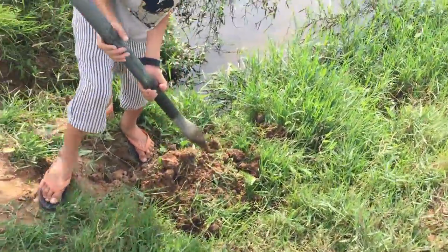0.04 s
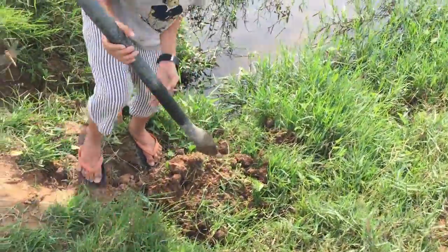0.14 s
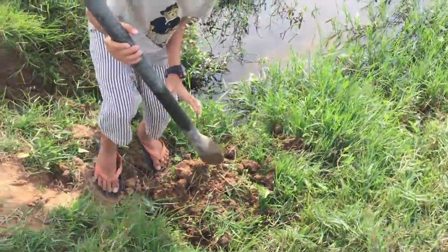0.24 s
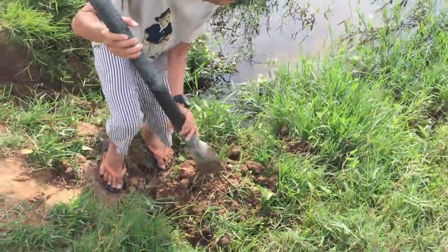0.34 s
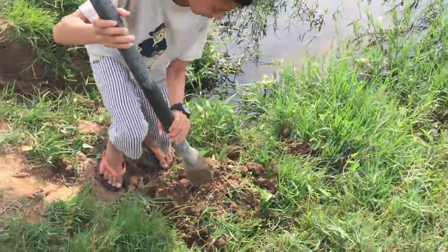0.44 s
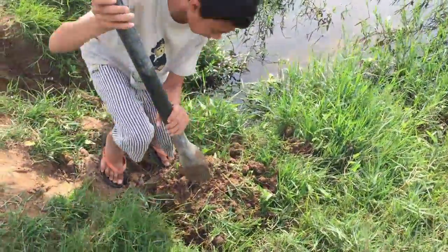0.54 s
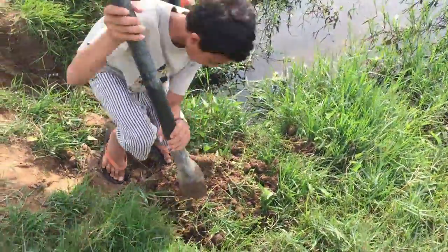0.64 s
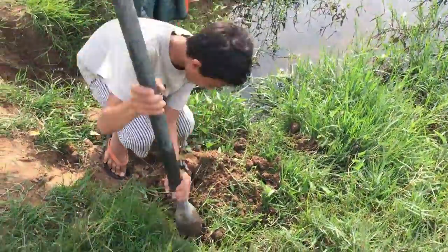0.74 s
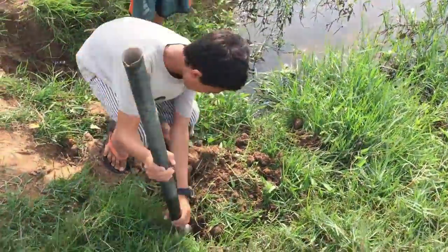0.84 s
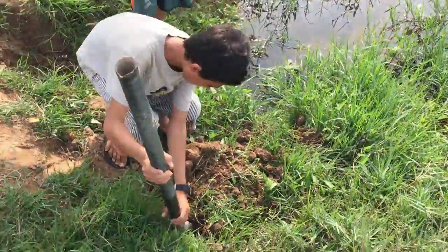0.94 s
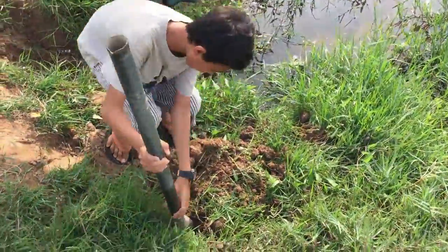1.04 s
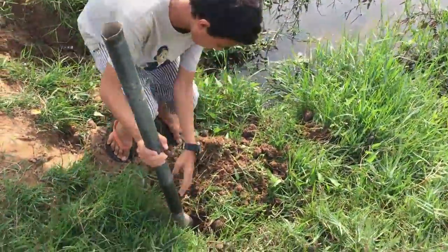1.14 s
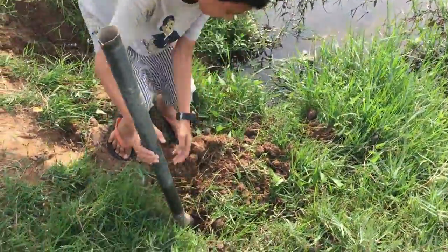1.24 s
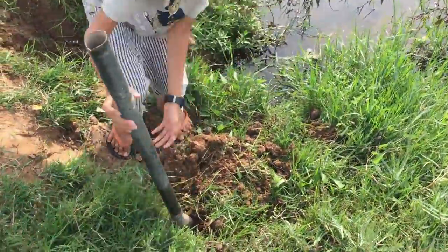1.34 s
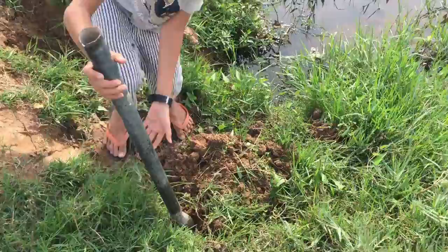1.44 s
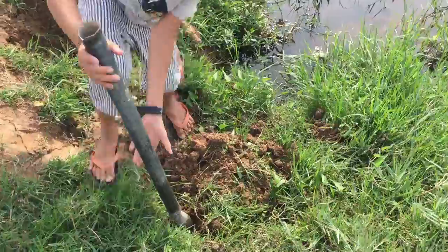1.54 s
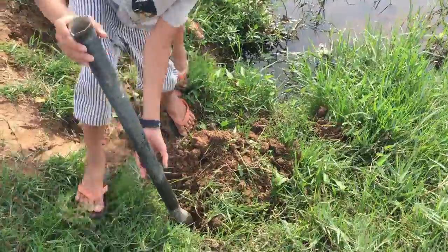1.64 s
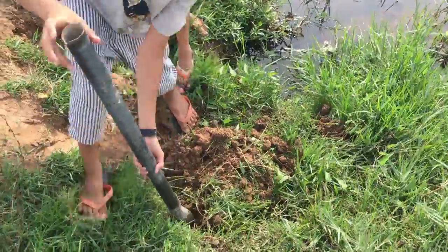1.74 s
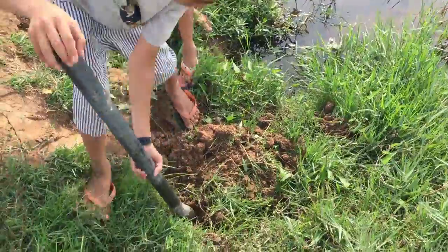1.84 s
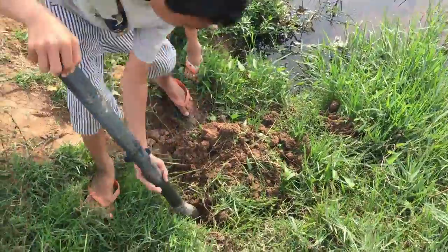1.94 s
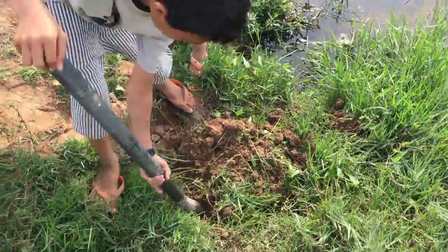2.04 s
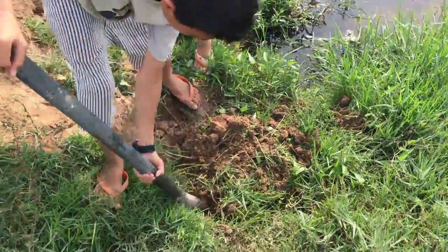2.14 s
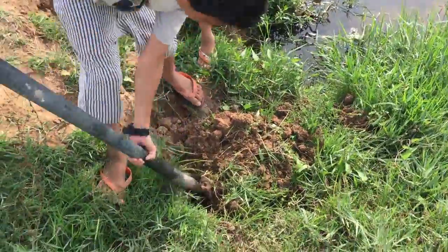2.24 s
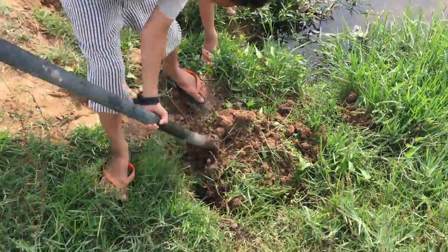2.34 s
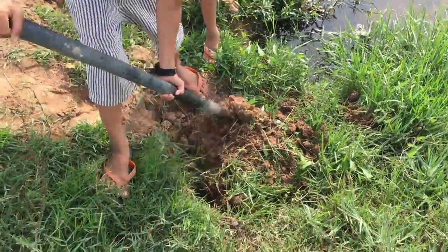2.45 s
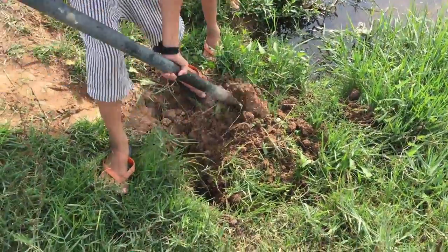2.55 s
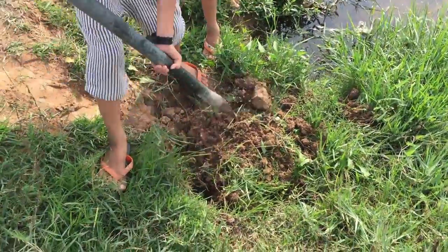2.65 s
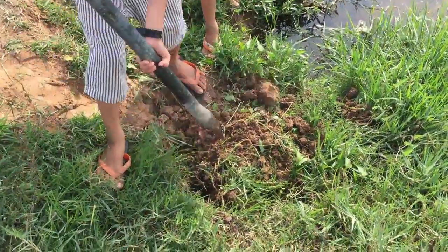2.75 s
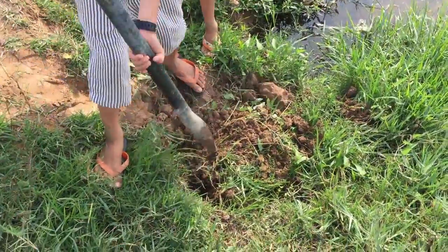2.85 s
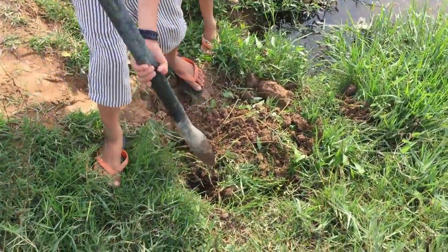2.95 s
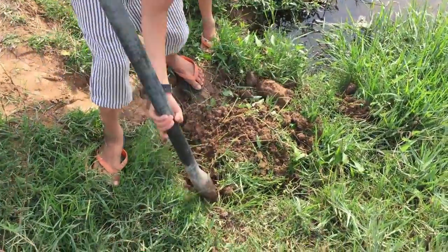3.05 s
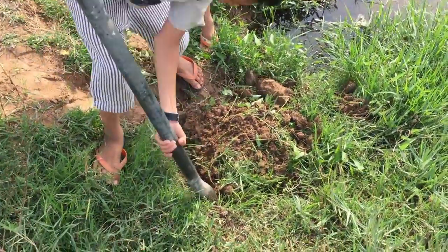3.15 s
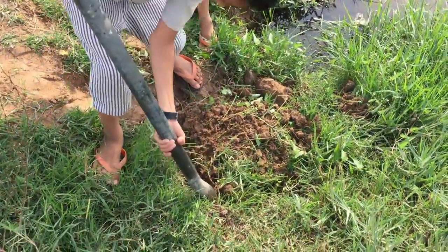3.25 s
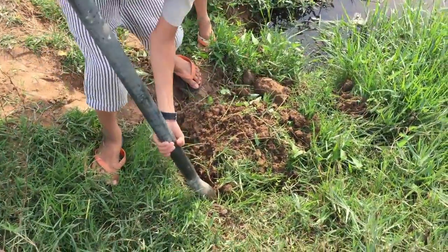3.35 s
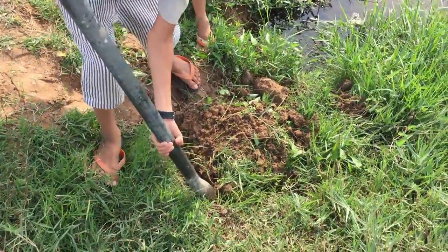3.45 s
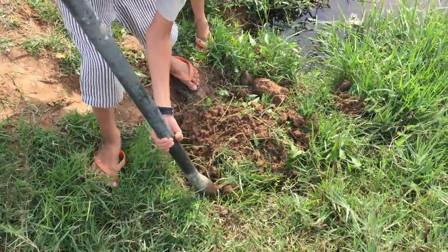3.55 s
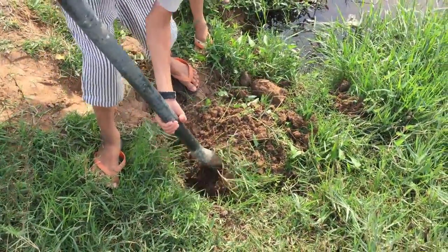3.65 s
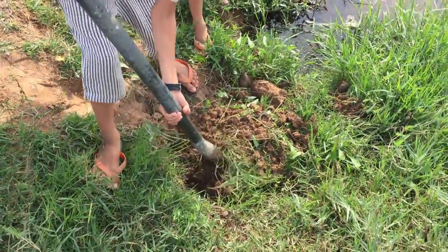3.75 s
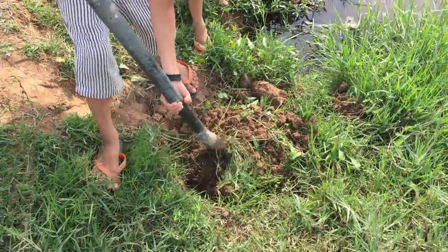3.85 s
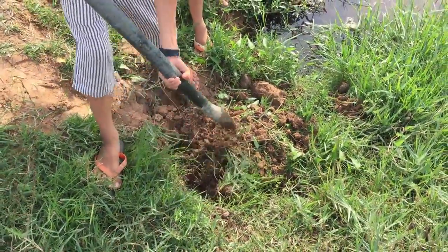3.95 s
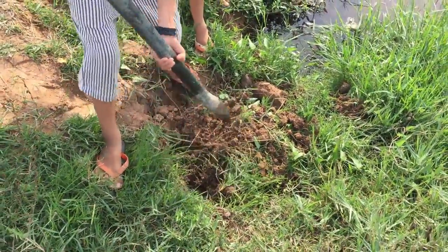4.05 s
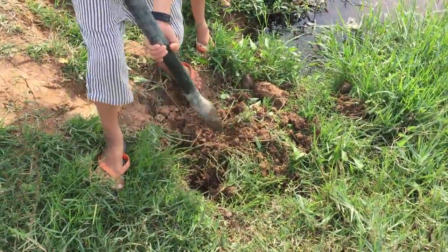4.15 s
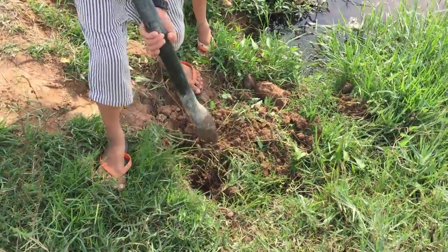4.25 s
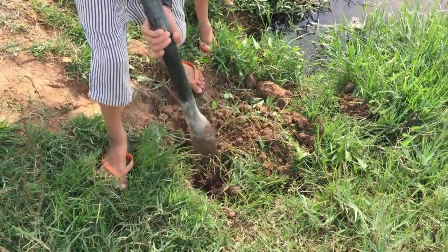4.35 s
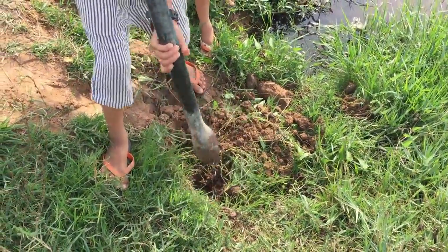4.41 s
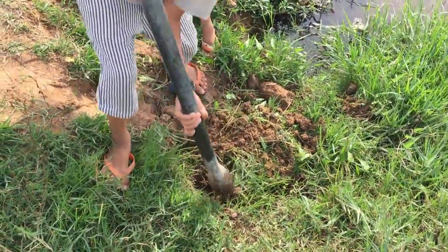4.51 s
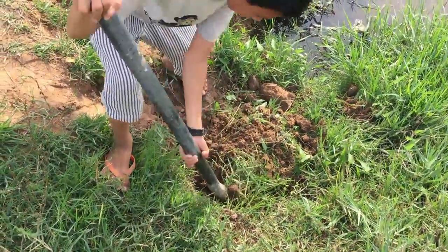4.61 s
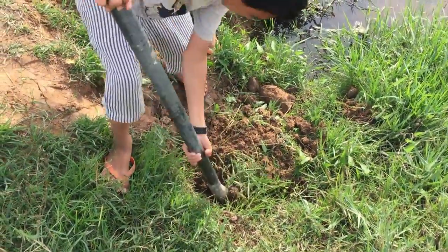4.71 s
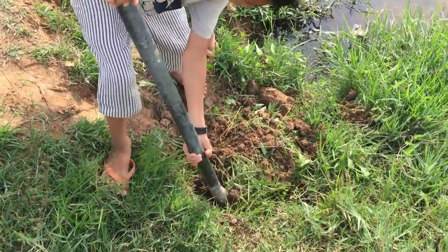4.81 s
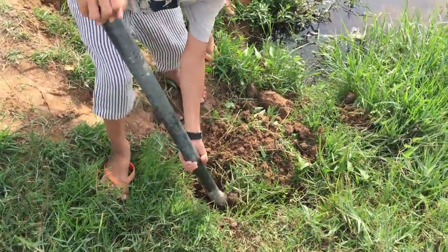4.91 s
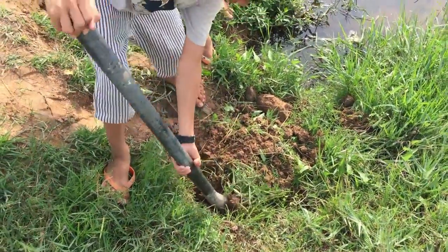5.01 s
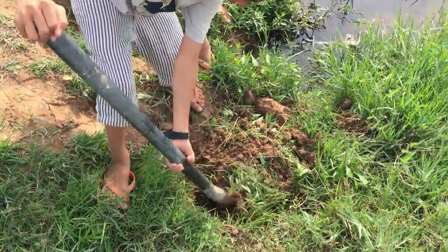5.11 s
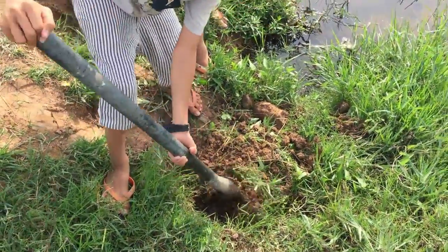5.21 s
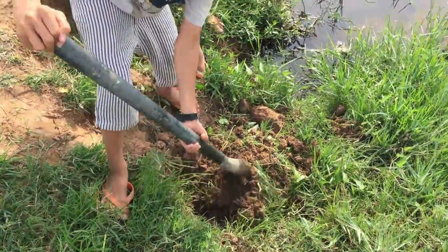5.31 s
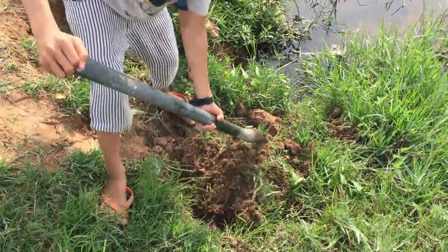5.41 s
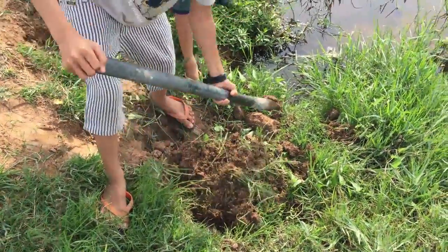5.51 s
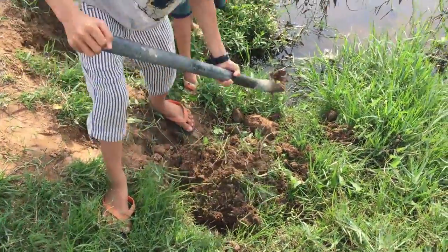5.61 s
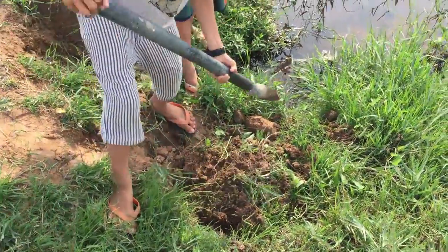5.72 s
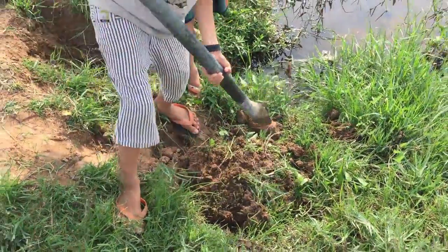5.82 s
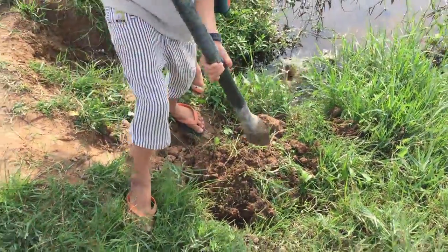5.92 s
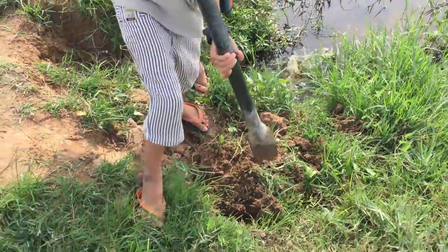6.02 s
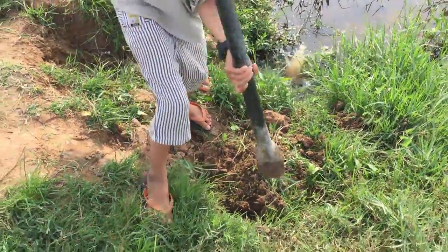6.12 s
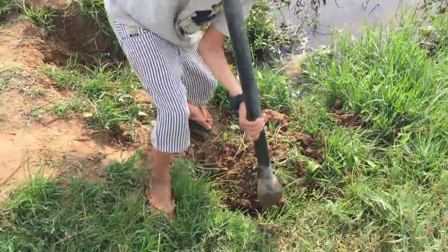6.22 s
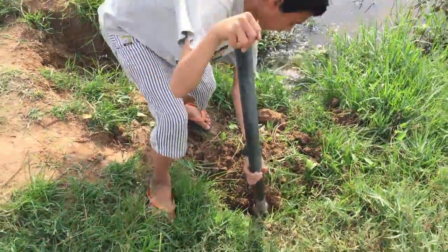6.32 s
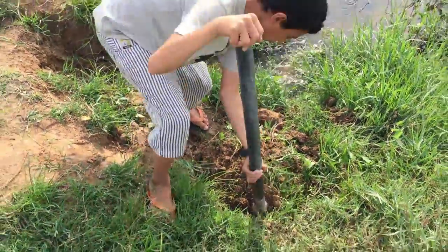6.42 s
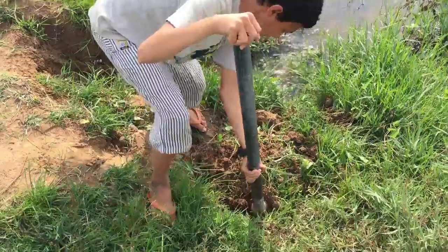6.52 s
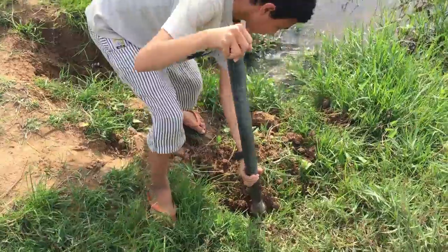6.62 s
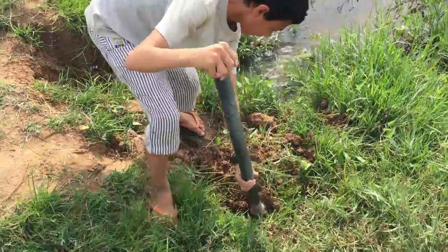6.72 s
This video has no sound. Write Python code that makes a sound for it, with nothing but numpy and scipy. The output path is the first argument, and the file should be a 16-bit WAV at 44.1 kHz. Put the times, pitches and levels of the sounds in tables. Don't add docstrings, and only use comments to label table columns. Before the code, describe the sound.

Outdoors on a grassy pond bank, a steel blade on a pipe handle digs damp soil close to the microphone. After soft grass rustle and bird whistles, a crunchy chop lands with a low thud and wet plop. Light prying scrapes follow, then harder cuts, clods breaking, roots snapping and crumbs falling, ending with two close bites. Quiet air, faint insects and a far engine rumble lie underneath.

```python
import sys
import numpy as np
from scipy import signal
from scipy.fft import rfft, irfft, next_fast_len
from scipy.io import wavfile
from scipy.ndimage import uniform_filter1d

SR = 44100
rng = np.random.default_rng(int(sys.argv[2]) if len(sys.argv) > 2 else 0)


def dump(signal):
    limited = np.clip(np.atleast_2d(signal).T, -1, 1)
    pcm = np.round(limited * 32767).astype(np.int16)
    wavfile.write(sys.argv[1], SR, pcm)


def invert_db(level):
    return 10 ** (np.asarray(level, dtype=float) / 20)


N = 298557
TIME = np.arange(N) / SR


def evened(x):
    return x / np.sqrt(np.mean(x ** 2) + 1e-20)


def noise():
    return rng.standard_normal(N)


def add(mix, s, sound):
    part = mix[round(s * SR):][:len(sound)]
    part += sound[:len(part)]


def coloured(x, points):
    hz, db = np.transpose(points)
    size = next_fast_len(N)
    log_hz = np.log(np.fft.rfftfreq(size, 1 / SR) + 1)
    shape = invert_db(np.interp(log_hz, np.log(hz), db))
    return evened(irfft(rfft(x, size) * shape, size)[:N])


def resonate(x, hz, width):
    return signal.lfilter(*signal.iirpeak(hz, hz / width, SR), x)


def grains(per_s, spread_db):
    size = invert_db(spread_db * np.minimum(rng.exponential(1, N), 4)) * rng.choice([-1, 1], N)
    return size * (rng.random(N) < per_s / SR)


def wobble(seconds, depth_db):
    count = max(int(seconds * SR), 1)
    slow = uniform_filter1d(uniform_filter1d(noise(), count), count)
    return invert_db(depth_db * evened(slow))


def patches(x, depth_db, size):
    z = signal.stft(x, nperseg=256)[2]
    spots = rng.standard_normal(z.T.shape)
    spots = uniform_filter1d(uniform_filter1d(spots, size, 0), 3, 1).T
    return evened(signal.istft(z * invert_db(depth_db * evened(spots)), nperseg=256)[1][:N])


def echoed(x, t60_s, length, echo_db):
    tail = evened(rng.standard_normal(length) * invert_db(-60 * TIME[:length] / t60_s)) / np.sqrt(length)
    return invert_db(echo_db) * signal.oaconvolve(x, tail)[:N]


def pressure(strokes):
    out = np.zeros(N)
    for s, rise, fall, db in strokes:
        rise, fall = max(rise, .001), max(fall, .002)
        t = np.arange(-min(2 * rise, s), 3 * fall, 1 / SR)
        u = np.abs(np.where(t < 0, t / rise, t / fall))
        add(out, s + t[0], invert_db(db) * (np.exp(-2 * u ** 1.9) + .08 * np.exp(-1.6 * u)))
    return out


def lever(rows, mass_db, grit, clod, mass, pipe):
    rub = pressure([row[:4] for row in rows])
    press = pressure([row[:3] + row[4:] for row in rows])
    return grit * rub + (.58 * clod + invert_db(mass_db) * mass + invert_db(2.5) * pipe) * press


def knocks(rows, t60_s=0, cycles=0, glide=0, soft_s=.0001):
    out = np.zeros(N)
    cracks = rng.standard_normal((len(rows), 256))
    for (s, db, hz, *tick_db), crack in zip(rows, cracks):
        t60 = t60_s + cycles / hz
        t = np.arange(0, t60 * 1.5, 1 / SR)
        tone = np.sin(2 * np.pi * hz * t * (1 + glide * t / t60))
        ring = tone * invert_db(-60 * t / t60) * (1 - np.exp(-t / soft_s))
        ring = ring / np.abs(ring).max()
        if tick_db:
            ring = ring + invert_db(tick_db[0]) * np.resize(crack, len(t)) * np.exp(-t / 0.00042)
        add(out, s, invert_db(db) * ring)
    return out


def wet_ring(rows, t60_s):
    return knocks(rows, t60_s, glide=0.045, soft_s=0.0012)


def note(length, from_hz, to_hz, db, slide_s, bend):
    t = np.arange(0, length, 1 / SR)
    left = np.clip((length - t) / min(slide_s, length), 0, 1) ** bend
    hz = uniform_filter1d(to_hz + (from_hz - to_hz) * left, 600, mode="nearest")
    return hz, np.sqrt(2) * invert_db(db) * np.sin(np.pi * (t / length) ** 0.87) ** 0.79


def sung(hz, gain):
    return gain * np.sin(2 * np.pi * np.cumsum(hz) / SR)


# (pitch [Hz], level [dB])
AIR = [(120, -22), (200, -16), (278, -6.5), (394, -12), (500, -12.5), (791, -13), (867, -14), (933, -12),
       (1910, -16), (2610, -20), (4200, -20), (4770, -23.5), (8900, -25.5), (10500, -28.5), (16000, -22.5)]


def still_air():
    return invert_db(-67.5) * patches(coloured(noise(), AIR), .8, size=20)


# (pitch [Hz], level per Hz [dB])
RUMBLE = [(12, -63), (20, -32.5), (24, -33), (35, -10.5), (52, -0.5), (69, 2), (86, 0), (102, -2.5),
          (125, -7.5), (217, -28.5), (260, -28), (340, -56), (570, -120)]
# (time [s], level [dB])
RUMBLE_DB = [(0.0, -49), (0.22, -47), (0.83, -52), (0.85, -48), (1.87, -53.5), (3.56, -49), (3.6, -57),
             (4.32, -48), (4.56, -58), (4.75, -48), (4.79, -52.5), (6.05, -48.5), (6.17, -40), (6.2, -47.5),
             (6.45, -45.5), (6.77, -53)]


def far_rumble():
    load = invert_db(np.interp(TIME, *np.transpose(RUMBLE_DB)))
    return load * coloured(noise(), RUMBLE) * wobble(0.01, 1.9) * wobble(0.048, 1.9)


def fuzzy_tone(hz, width, db):
    return invert_db(db) * evened(resonate(resonate(noise(), hz, width), hz, 2 * width))


# (pitch [Hz], width [Hz], level [dB])
ENGINE = (78.1, 9, -58)
HUM = (855, 8, -79.5)


def machine_tones():
    hum_gain = np.interp(TIME, [2.6, 3, 5.2, 5.5], [0.61, 1, 0.97, .4])
    return fuzzy_tone(*ENGINE) + fuzzy_tone(*HUM) * hum_gain


# (pitch [Hz], width [Hz], level [dB])
INSECT_BAND = (8900, 500, -83)


def insects():
    return fuzzy_tone(*INSECT_BAND) * np.interp(TIME, [3, 4.2, 5.5, 6.5], [.3, 1, 1, .5])


# (pitch [Hz], level per Hz [dB])
GRIT = [(1530, -19), (2600, -5), (3570, -3), (4840, -6.5), (5760, -4.5), (6260, -4), (8160, -7.5),
        (9210, -3.5), (10600, -10.5), (11500, -6.5), (14000, -7.5), (15100, -6), (15900, -6.5)]


def grit_hiss():
    return patches(coloured(grains(16000, 3.0), GRIT), 2.3, size=14) * wobble(.003, 2.0)


# (pitch [Hz], level [dB])
CLOD = [(600, -25), (1000, 0.5), (1500, 6.5), (2100, 7), (2800, 2.5), (3500, -5), (4400, 0)]


def clod_crunch(count=24, cycles=19.6):
    hz, db = np.transpose(CLOD)
    cracks, which = grains(6000, 2.9), rng.integers(0, count, N)
    out = np.zeros(N)
    for k, f in enumerate(np.geomspace(hz[0], hz[-1], count)):
        t = np.arange(0, 2 * cycles / f, 1 / SR)
        ring = np.sin(2 * np.pi * f * t) * np.exp(-3 * t * f / cycles) * (1 - np.exp(-t * f))
        ring = ring / np.linalg.norm(ring)
        out += invert_db(np.interp(f, hz, db)) * signal.oaconvolve(cracks * (which == k), ring)[:N]
    return evened(out) * wobble(0.0023, 1.0)


def soil_push():
    return evened(resonate(resonate(grains(700, 3.9), 300, 740), 230, 680))


# (pitch [Hz], width [Hz], level [dB])
PIPE = [(800, 70, -9), (1140, 70, -2), (1567, 40, 1), (2050, 50, -1), (2370, 55, -4.5), (2670, 55, 1),
        (3580, 70, -6), (4270, 57, -6), (6460, 70, -10)]


def pipe_singing():
    drag = noise() * wobble(.012, 3)
    return evened(sum(invert_db(db) * evened(resonate(drag, hz, width)) for hz, width, db in PIPE))


# (time [s], level [dB])
STIR = [(0, -64), (.17, -77), (.3, -63), (.75, -65), (.89, -57.5), (1.09, -66), (1.5, -69), (1.85, -61.5),
        (2.06, -64.5), (2.4, -64), (2.9, -67), (3.5, -72), (4.37, -73), (5.1, -71), (5.7, -67.5),
        (6.1, -62), (6.5, -66.5), (6.77, -62.5)]


def stirring(grit, clod):
    stir_db = np.interp(TIME, *np.transpose(STIR))
    crumb_db = -71.5 + 1.07 * (stir_db + 65)
    return wobble(.03, 1.4) * (grit * invert_db(stir_db - 4.0) + clod * invert_db(crumb_db))


# (peak time [s], rise [s], fall [s], level [dB])
BRUSHES = [
    (.05, .042, 0.015, -59),
    (2.07, 0.071, 0.038, -63),
    (2.68, 0.084, 0.13, -68.5),
    (2.78, 0.069, 0.11, -64.5),
    (3.965, .028, .033, -56),
    (3.925, .03, .03, -64),
    (6.21, 0.14, .047, -62),
    (6.0, .08, .08, -68),
]


def brushing(grit):
    return grit * pressure(BRUSHES)


# (start [s], length [s], first pitch [Hz], last pitch [Hz], level [dB])
FAR_BIRDS = [(.08, .075, 5900, 4200, -55.5), (.1, .08, 2900, 2600, -64), (.155, .05, 4000, 4300, -64),
             (0.876, .035, 6000, 4950, -59), (1.12, .1, 3000, 2780, -71), (1.195, .014, 4200, 4350, -69),
             (1.21, 0.034, 4500, 4000, -63.5), (1.243, 0.045, 3550, 2850, -66),
             (1.285, .03, 2700, 2500, -74), (1.6, .04, 2800, 2800, -64), (1.96, 0.15, 2910, 2800, -68),
             (3.113, .04, 4400, 4050, -67), (3.218, 0.12, 2980, 2960, -66), (4.31, .04, 4200, 4150, -67),
             (4.335, .03, 3340, 3380, -72), (6.18, .08, 1274, 1720, -66.5), (6.223, .1, 4450, 4100, -68),
             (6.324, .05, 1830, 1540, -58), (6.5, 0.067, 1520, 1906, -60), (6.582, .09, 1750, 1680, -57)]


def far_birds():
    out = np.zeros(N)
    waver, blur = (evened(uniform_filter1d(noise(), size)) for size in (110, 40))
    for s, length, from_hz, to_hz, db in FAR_BIRDS:
        hz, gain = note(length, from_hz, to_hz, db, slide_s=length, bend=1.8)
        here = slice(round(s * SR), round(s * SR) + len(hz))
        blur_hz = 45 + 0.12 * abs(from_hz - to_hz)
        add(out, s, sung(hz + blur_hz * blur[here], gain * (0.75 + 0.4 * waver[here])))
    return out


# (peak time [s], rise [s], fall [s], grit level [dB], clod level [dB])
SCRAPES = [(.14, 0.13, .11, -57.5, -65.5), (1.395, 0.084, .12, -62.5, -69.5),
           (1.489, 0.032, 0.099, -60, -65), (1.741, 0.011, 0.043, -44.5, -55),
           (1.85, 0.084, 0.042, -53.5, -63.5), (2.28, 0.053, 0.057, -53, -60),
           (2.38, 0.082, 0.033, -63, -68), (2.452, .0043, .0073, -58, -70), (2.5, 0.045, 0.038, -51, -63.5),
           (3.775, 0.013, 0.017, -48, -57), (3.814, 0.043, 0.022, -51.5, -62),
           (3.985, 0.004, 0.007, -51, -58), (4.013, .021, 0.018, -55.5, -68), (5.15, .08, .05, -60, -72),
           (5.208, .045, 0.07, -51.5, -57), (5.345, 0.092, 0.17, -53, -62), (5.43, .012, 0.064, -47.5, -61),
           (5.484, 0.038, 0.018, -54, -62.5), (5.996, 0.034, .017, -47.5, -55),
           (6.02, 0.012, 0.02, -48, -52), (6.045, .02, .02, -58, -54), (6.066, .012, 0.034, -53, -48.5),
           (6.52, .14, 0.1, -59.5, -67.5), (6.66, .08, .1, -71.5, -71), (5.88, 0.082, 0.048, -79, -73.5),
           (1.9, .05, 0.083, -68, -69)]


def scraping(grit, clod, mass, pipe):
    return lever(SCRAPES, -16, grit, clod, mass, pipe)


# (start [s], length [s], final top pitch [Hz], level [dB], fade [dB])
TRILLS = [
    (.1645, .175, 3770, -54.5, -4),
    (0.955, .175, 3640, -55.5, -12.5),
]
# (first rate [beats/s], last rate [beats/s])
BEATS_PER_S = [
    (62, 99),
    (46, 93),
]
# (first drop [Hz], last drop [Hz])
DIP_HZ = [
    (800, 520),
    (850, 850),
]


def trills():
    out = np.zeros(N)
    start_hz, climb = 3200, 6.5
    for (s, length, top_hz, db, fade_db), beats_per_s, dip_hz in zip(TRILLS, BEATS_PER_S, DIP_HZ):
        u = np.arange(0, length, 1 / SR) / length
        turn = np.cumsum(np.interp(u, [0, 1], beats_per_s)) / SR % 1
        hz = top_hz + (start_hz - top_hz) * np.exp(-climb * u)
        hz = hz - np.interp(u, [0, 1], dip_hz) * turn ** 2.3
        beat = np.sin(np.pi * turn ** .62) ** 1.1
        gain = 2 * invert_db(db + fade_db * u ** 3) * signal.windows.tukey(len(u), .2) * beat
        add(out, s, sung(hz, gain))
    return out


# (time [s], peak level [dB], pitch [Hz])
CRUMBS = [(.349, -56, 3600), (3.586, -52, 820), (3.67, -48, 620), (3.684, -42, 2670), (3.702, -45, 2700),
          (3.638, -48, 2700), (3.771, -49, 3500), (3.775, -48, 1300), (3.96, -50, 2710), (3.983, -50, 3600),
          (3.985, -47, 6400), (5.196, -41, 3940), (5.212, -44, 3000), (5.18, -48, 1950), (5.283, -51, 900),
          (5.376, -48, 4200), (5.426, -46, 2060), (5.445, -46, 1400), (5.485, -46, 3400),
          (5.487, -46, 5200), (5.954, -50, 5500), (5.966, -46, 6700), (5.979, -41, 2020),
          (5.994, -42, 1900), (6.018, -38, 1450), (6.027, -37, 2390), (6.032, -44, 6200),
          (6.056, -43, 3800), (6.056, -44, 7000), (6.064, -42, 5600), (6.068, -42, 4100),
          (6.075, -42, 1700), (6.102, -42, 2200), (6.124, -46, 2300), (6.353, -42, 1750),
          (6.435, -44, 5500), (6.455, -48, 1100), (6.48, -50, 2300), (6.548, -50, 1900), (6.583, -54, 3100),
          (6.595, -50, 1800), (6.62, -50, 1650), (6.648, -51, 1850), (6.685, -54, 1400),
          (4.468, -64, 12500), (4.539, -61, 14000), (4.59, -60, 15200), (4.932, -61, 11000),
          (4.972, -60, 13000), (4.676, -30, 4100), (4.668, -32, 9200), (4.682, -32, 8000), (3.2, -34, 760),
          (.471, -58, 1500)]


def falling_crumbs():
    return knocks(CRUMBS, .005, cycles=11, soft_s=.0004)


# (time [s], peak level [dB], pitch [Hz])
POCKETS = [
    (.373, -53, 483),
    (3.637, -55, 600),
    (5.075, -63, 2800),
]


def water_pockets():
    return wet_ring(POCKETS, t60_s=0.084)


# (start [s], length [s], first pitch [Hz], last pitch [Hz], level [dB])
WHISTLES = [
    (.452, .115, 4170, 2960, -50),
    (.582, 0.027, 2990, 2840, -56.5),
    (0.678, 0.14, 3710, 2660, -50),
]


def whistles():
    out = np.zeros(N)
    for s, *row in WHISTLES:
        add(out, s, sung(*note(*row, slide_s=.1, bend=1.4)))
    return out


# (time [s], peak level [dB], pitch [Hz], wide tick level [dB])
TICKS = [(.471, -55, 7500, 0), (1.0327, -44, 7310, -13), (1.1598, -54, 7040, -6), (2.1918, -46, 7360, -6),
         (3.3816, -52.5, 8770, 5), (3.8802, -55, 5920, -6), (3.984, -35.5, 8560, -1),
         (5.4257, -42, 6500, -2), (5.9923, -35, 5760, -11), (6.02, -44, 5500, -3), (6.066, -36, 9000, 2)]


def pebble_ticks():
    return knocks(TICKS, t60_s=0.0073)


# (peak time [s], fall [s], grit level [dB], clod level [dB], soil mass level [dB])
CUTS = [(.911, 0.011, -40.5, -52, -41), (.925, 0.021, -29, -32.5, -42), (3.175, .015, -54, -56, -65),
        (3.189, .012, -35, -35.5, -42), (3.198, .007, -26, -28.5, -45), (3.205, 0.01, -26.5, -30, -44),
        (3.216, 0.009, -39.5, -41, -48), (4.661, .014, -34.5, -41, -49), (4.677, .024, -29, -42, -39),
        (6.091, .009, -29.5, -32, -68), (6.108, 0.012, -44.5, -48, -68), (6.125, 0.03, -56, -57, -68),
        (6.381, 0.022, -37.5, -46, -48), (6.406, 0.022, -30, -40.5, -44)]
# (pitch [Hz], level [dB], time to fall 60 dB [s])
BLADE = [
    (5720, -9, 0.021),
    (8400, -8, .09),
]


def cutting(grit, clod, mass):
    bite_grit, bite_clod, bite_mass = (
        pressure([(s, 0.57 * fall, fall, db[k]) for s, fall, *db in CUTS]) for k in range(3))
    shake = noise() * bite_grit
    steel = sum(invert_db(db) * resonate(shake, hz, 2.5 / t60) for hz, db, t60 in BLADE)
    return grit * bite_grit + clod * bite_clod + mass * bite_mass + invert_db(15) * steel


# (time [s], peak level [dB], pitch [Hz])
THUDS = [(.943, -30.5, 132), (.914, -35, 273), (3.205, -43, 160), (4.668, -28.5, 346), (4.672, -36.5, 185),
         (3.2, -41, 240), (5.8, -46, 121), (7.3, -38.5, 78), (6.418, -28.5, 130), (5.44, -41, 103),
         (1.51, -56, 430), (1.878, -52, 190), (2.238, -58, 460), (2.855, -57.5, 303), (6.092, -43, 450),
         (6.764, -52, 220), (5.17, -55, 260), (5.455, -51, 290), (6.402, -33.5, 322), (6.758, -58, 330)]


def ground_thuds():
    return knocks(THUDS, cycles=8.6, soft_s=0.0021)


# (time [s], peak level [dB], pitch [Hz])
PLOPS = [(.918, -29, 1510), (1.456, -55, 1650), (1.803, -50, 2520), (1.839, -47.5, 2350),
         (1.859, -50, 1930), (3.202, -21.5, 1085), (3.605, -52, 776), (5.973, -47.5, 1970),
         (5.999, -39.5, 1344), (6.062, -33.5, 1070), (6.066, -36, 800), (6.089, -31, 1046),
         (6.404, -29.5, 2190), (6.494, -39, 1496), (6.528, -50, 2430), (5.36, -52, 1590)]


def water_plops():
    return wet_ring(PLOPS, t60_s=.034)


# (time [s], peak level [dB], pitch [Hz])
STONES = [(.92, -32, 9400), (.922, -33, 5350), (3.196, -25, 4350), (3.203, -27.5, 4000), (4.672, -35, 6050),
          (6.092, -34, 5300), (6.404, -31, 4200), (6.091, -33, 3900), (3.212, -34, 2900),
          (6.404, -29.5, 8270), (5.195, -56, 3800)]


def stone_chimes():
    return wet_ring(STONES, t60_s=0.025)


# (time [s], peak level [dB], pitch [Hz], wide tick level [dB])
SNAPS = [(1.51, -45, 1840, -14), (1.928, -34.5, 1700, -12), (3.2042, -22, 2430, 6), (3.2095, -24, 1130, 8),
         (3.605, -51, 1110, -12), (3.638, -39, 1100, -2), (3.67, -46, 2620, -6), (3.683, -37, 1150, -4),
         (3.707, -43, 1100, -6), (3.699, -48, 1710, -8), (5.23, -42, 1960, -3), (5.279, -44, 2500, -16),
         (5.4545, -25, 3970, -3), (5.841, -44.5, 1740, -17), (5.857, -54, 1590, -8),
         (5.873, -51, 1190, -11), (6.026, -36, 1350, -8), (6.056, -42, 930, 2), (6.354, -40, 2560, -18),
         (6.376, -31.5, 3070, -8), (6.437, -41, 1850, -6), (6.318, -45, 3160, -20),
         (5.279, -40.5, 590, -14), (5.279, -46, 1300, -12), (5.954, -47.5, 1500, -6)]


def root_snaps():
    return knocks(SNAPS, t60_s=0.008)


# (peak time [s], rise [s], fall [s], grit level [dB], clod level [dB])
HEAVES = [
    (3.641, 0.062, .03, -64, -60.5),
    (3.686, 0.005, .008, -52, -51),
    (3.703, 0.012, 0.016, -48, -51),
    (3.671, .006, .005, -58, -59),
    (3.74, .04, .04, -54, -70),
    (3.665, .03, .03, -61, -63),
    (5.282, .003, .014, -64, -58),
    (6.44, 0.0067, 0.037, -68, -55.5),
]


def heaving(grit, clod, mass, pipe):
    return lever(HEAVES, -3, grit, clod, mass, pipe)


def scene():
    grit, clod, mass, pipe = grit_hiss(), clod_crunch(), soil_push(), pipe_singing()
    soil = stirring(grit, clod) + brushing(grit) + scraping(grit, clod, mass, pipe)
    soil = soil + cutting(grit, clod, mass) + heaving(grit, clod, mass, pipe)
    rings = water_pockets() + water_plops() + stone_chimes()
    near = soil + pebble_ticks() + ground_thuds() + root_snaps() + rings * wobble(0.0012, 2.7)
    near = near + echoed(near, 0.27, SR // 4, -25.5)
    calls = far_birds() + trills() + whistles()
    birds = calls * wobble(0.0051, 2.8) + echoed(calls, 0.24, SR // 2, -9.5)
    background = still_air() + far_rumble() + machine_tones() + insects()
    return (background + near + birds + falling_crumbs())[None]


def band_limit(x):
    return signal.sosfilt(signal.butter(12, 16470, fs=SR, output="sos"), x)


def record(dry):
    edge = signal.firwin(511, 15850, window=("kaiser", 9), fs=SR)
    wind_cut = signal.butter(2, 28, "highpass", fs=SR, output="sos")
    mix = signal.oaconvolve(signal.sosfilt(wind_cut, dry), edge[None], "same")
    return band_limit(mix)


dry = scene()
out = record(dry)
dump(out)
```